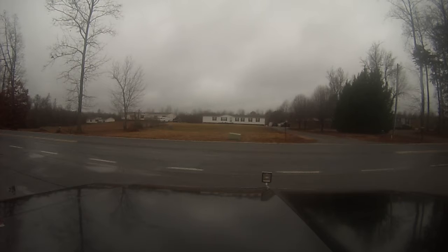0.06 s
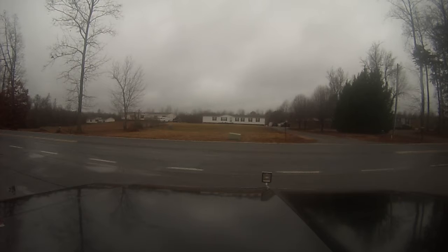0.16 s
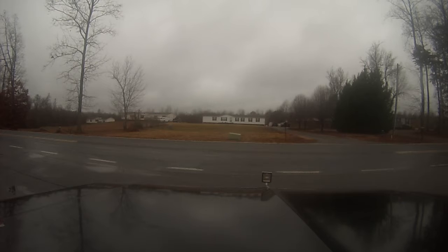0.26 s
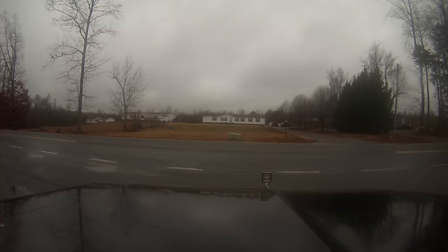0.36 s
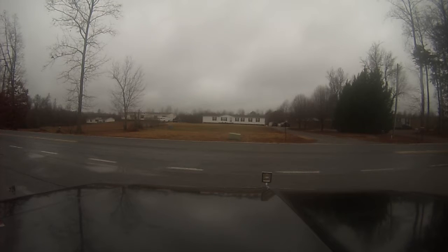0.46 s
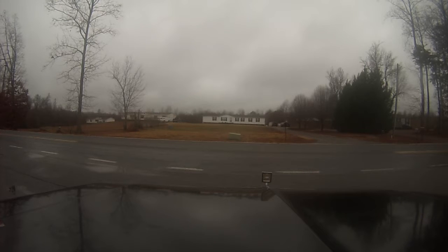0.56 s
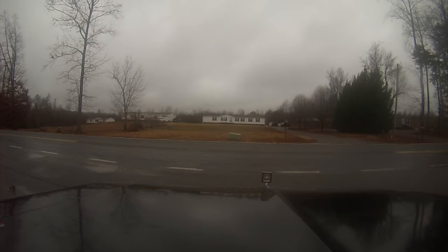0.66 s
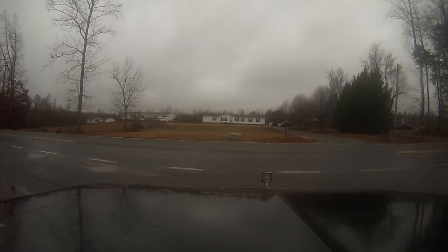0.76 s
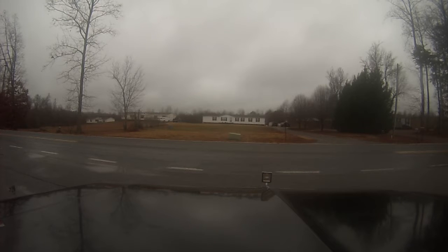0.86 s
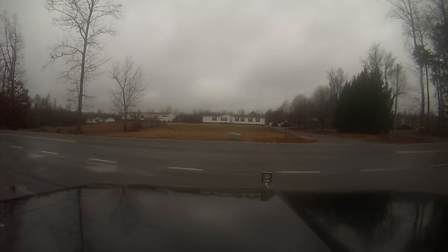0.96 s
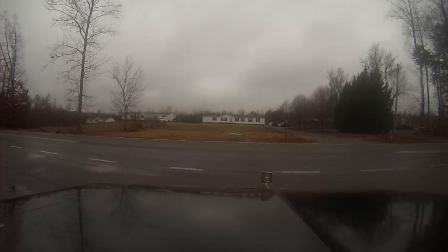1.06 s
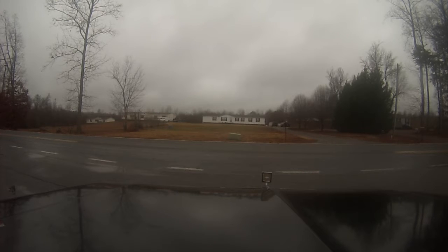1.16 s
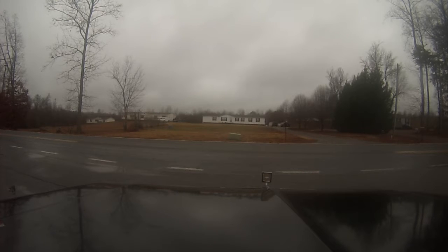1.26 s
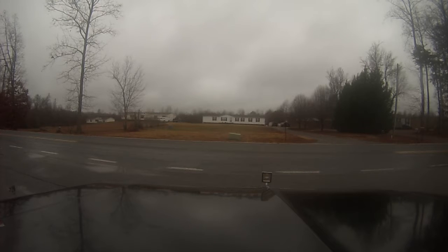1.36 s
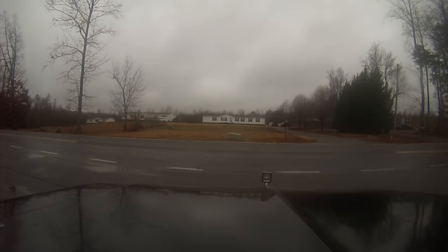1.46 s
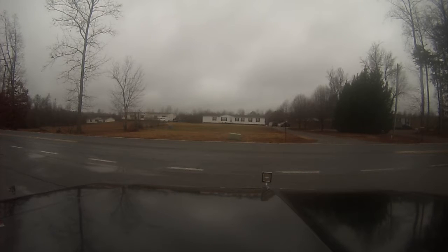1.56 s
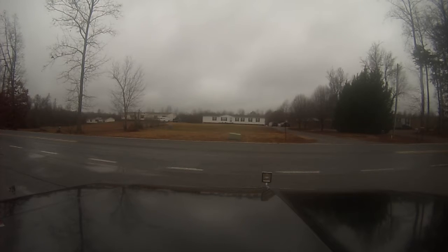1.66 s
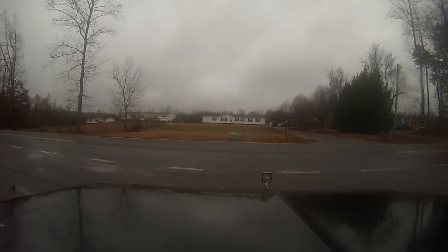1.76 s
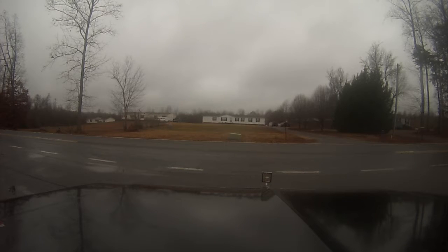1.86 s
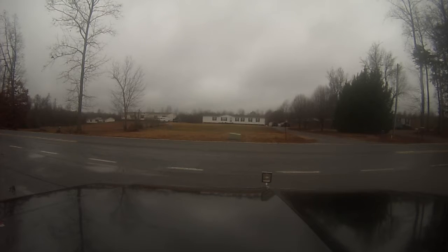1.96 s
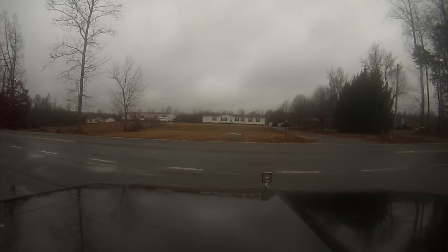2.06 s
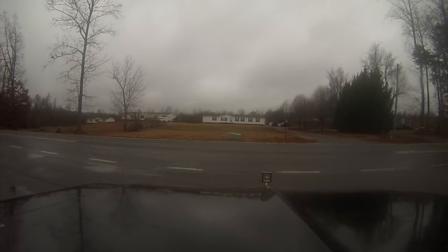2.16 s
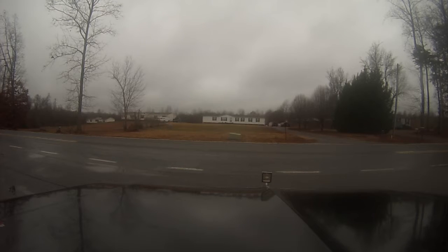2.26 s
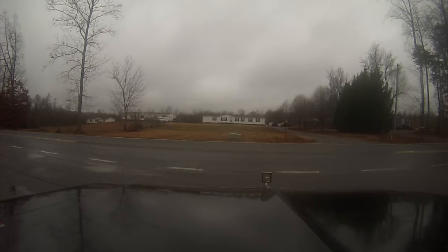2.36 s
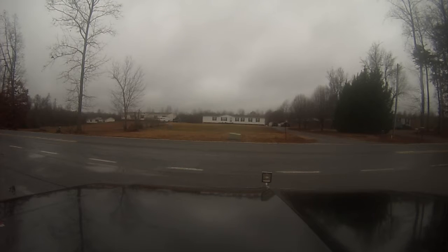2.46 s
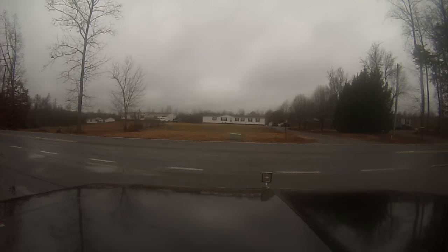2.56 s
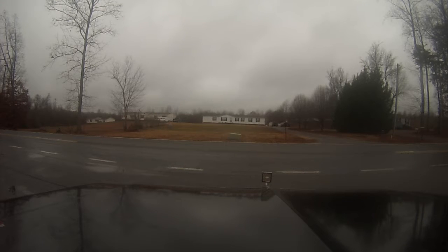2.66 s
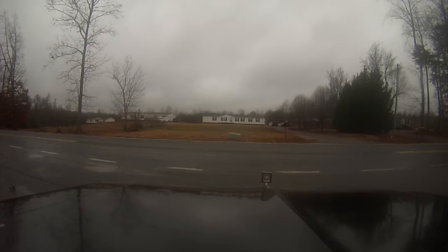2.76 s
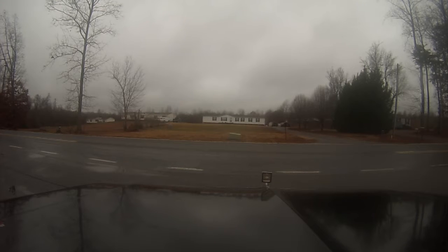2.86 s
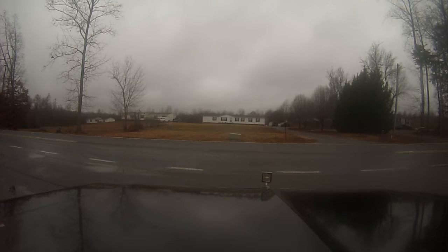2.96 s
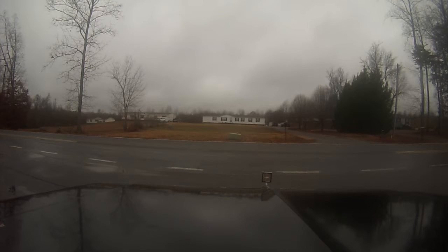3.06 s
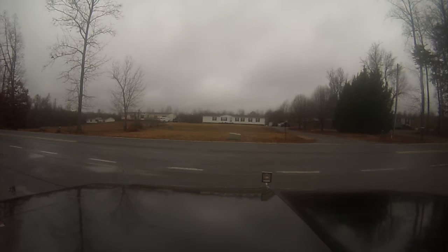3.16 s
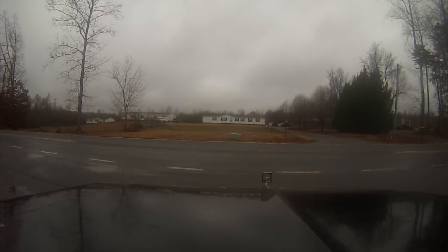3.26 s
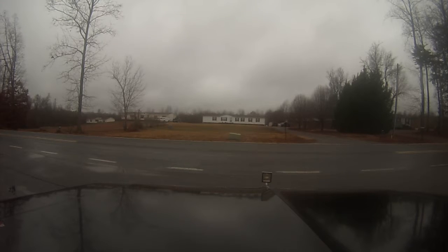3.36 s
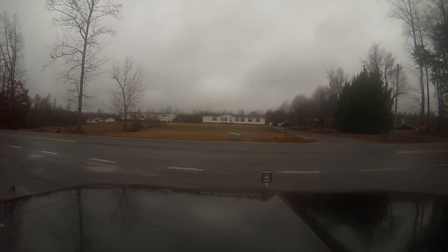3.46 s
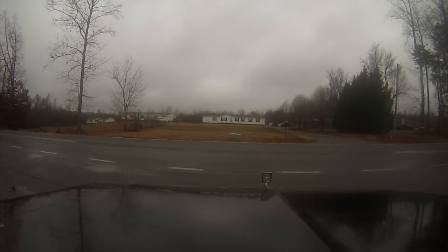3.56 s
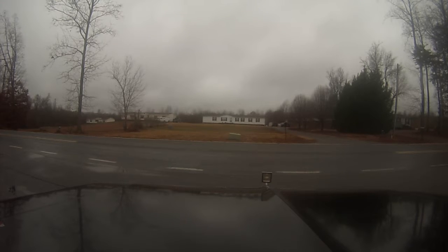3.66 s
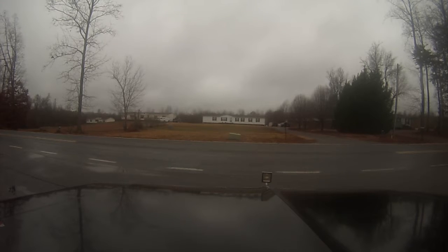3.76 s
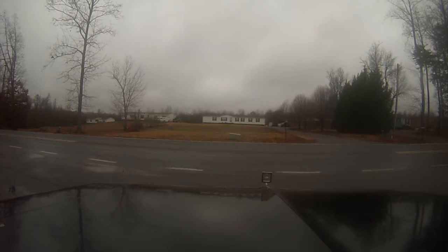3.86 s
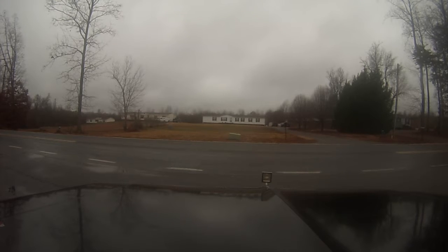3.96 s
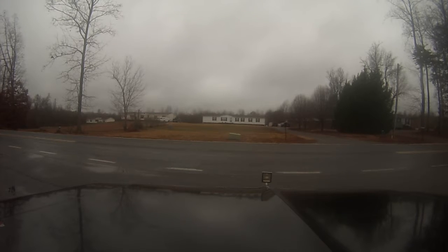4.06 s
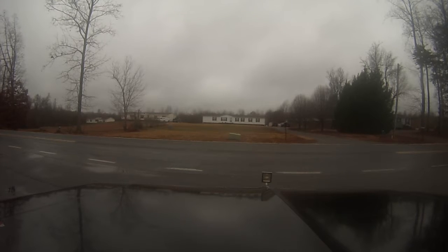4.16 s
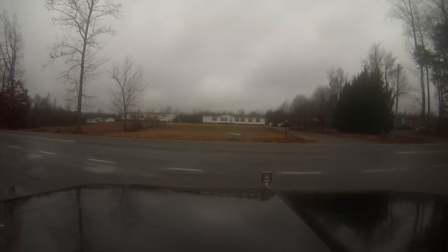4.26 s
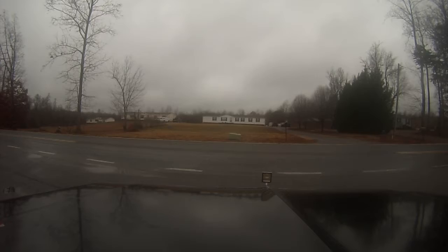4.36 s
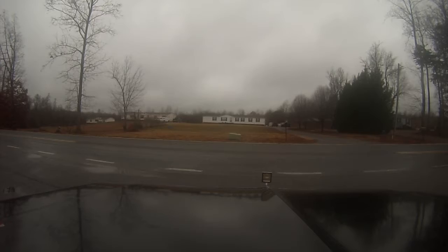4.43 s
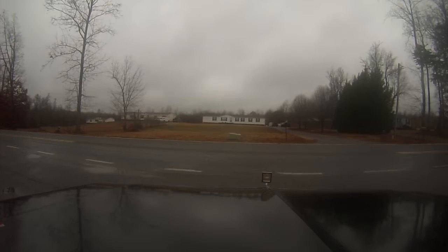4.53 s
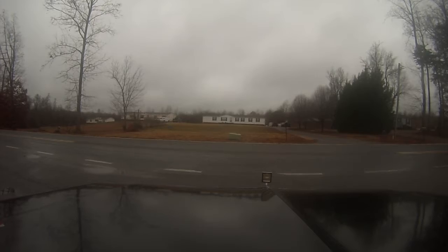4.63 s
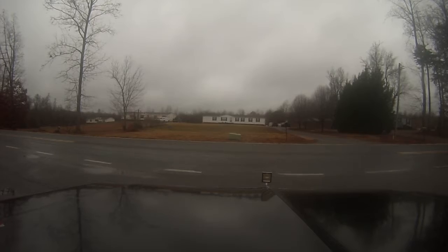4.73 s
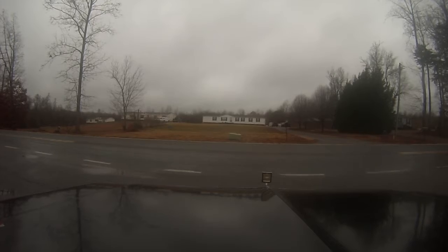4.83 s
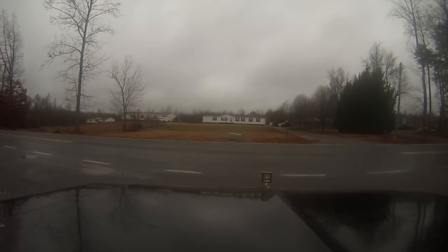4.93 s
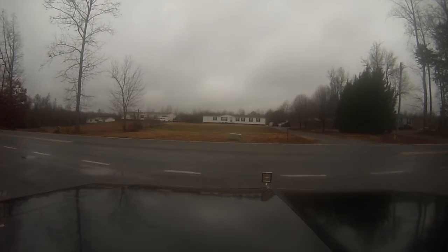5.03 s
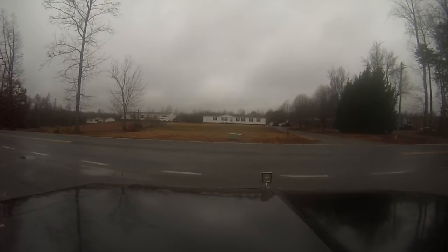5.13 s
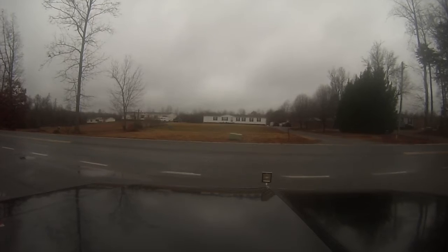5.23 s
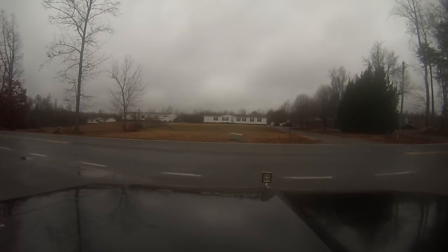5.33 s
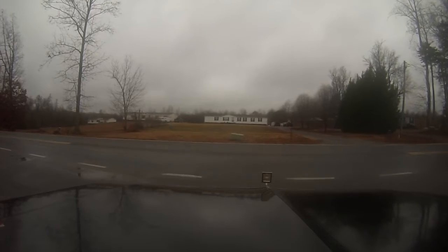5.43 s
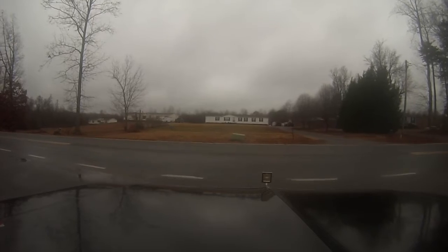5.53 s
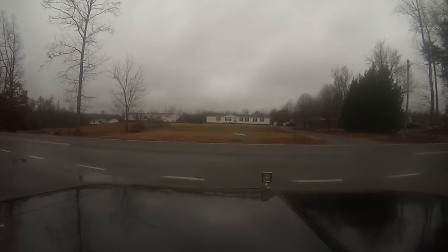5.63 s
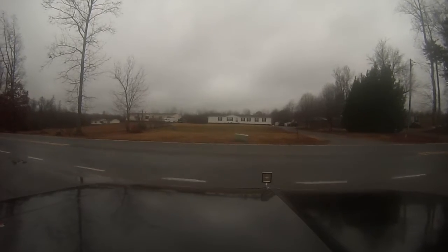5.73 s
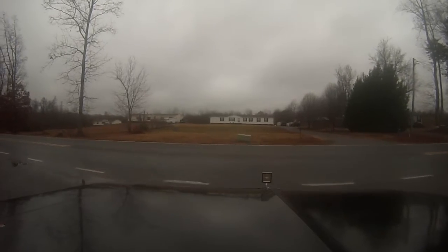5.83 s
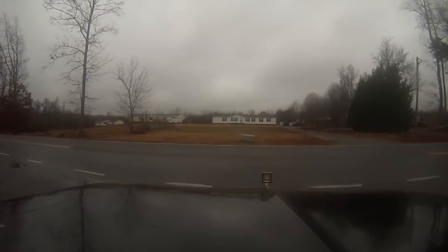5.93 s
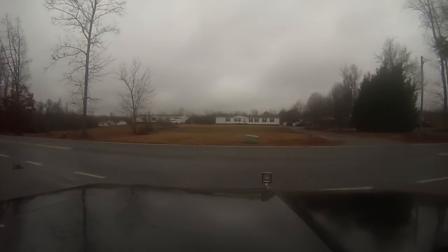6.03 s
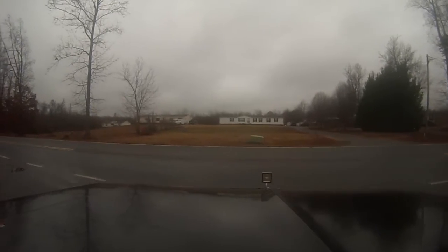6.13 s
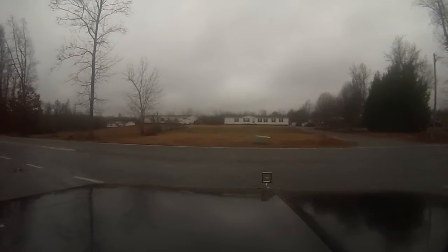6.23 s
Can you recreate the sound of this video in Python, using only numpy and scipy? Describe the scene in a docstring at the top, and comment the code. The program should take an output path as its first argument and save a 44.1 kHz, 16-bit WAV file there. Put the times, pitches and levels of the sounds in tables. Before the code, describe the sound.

A truck engine idles with a low, chugging hum, heard from inside the cab, then revs up and pulls away.

```python
"""Inside the cab of a V8 truck. At first the engine idles: unequal cylinders make the cab air chug
and boom near 137 Hz, the body rocks on its mounts, and a heater blower rushes and hums throughout.
After about four seconds the truck pulls away. The crank orders climb through the panel resonances,
and the intake growl and engine roar grow with the load, with brief pitched swells in the roar.
Near the end, loose trim buzzes and chirps as the body twists, and the loudest moments crackle softly."""
import sys
import numpy as np
from scipy.fft import rfft, irfft, next_fast_len
from scipy.io import wavfile
from scipy.ndimage import map_coordinates

SR = 44100
rng = np.random.default_rng(int(sys.argv[2]) if len(sys.argv) > 2 else 0)


def int16_out(signal):
    """Quantize to a 16-bit WAV file."""
    q = np.round(np.clip(np.atleast_2d(signal).T, -1, 1) * 32767)
    wavfile.write(sys.argv[1], SR, q.astype(np.int16))


N = 277389
FIRINGS = 8  # per four-stroke cycle

# Each row: time in seconds, firings per second, load in dB relative to full pull.
SPEED_AND_LOAD = [(0, 37.34, -26), (4.25, 37.34, -23), (4.5, 42, -19), (4.87, 44.7, -16.5), (5.04, 48, -14),
                  (5.14, 51, -12), (5.23, 56, -10), (5.33, 62.5, -7), (5.53, 69, -5.5), (5.62, 72, -4.5),
                  (5.71, 75.2, -1.5), (5.78, 83, .5), (5.96, 98, -2), (6.01, 101, -8), (6.06, 104, -7.5),
                  (6.1, 106.5, -4), (6.18, 111, -2.5), (6.29, 115, 0)]
def crank():
    """Phase is the integral of frequency: a slightly unsteady firing rate gives the count of cycles."""
    rate, load_db = curves(SPEED_AND_LOAD)
    cycles = np.cumsum(rate * (1 + 0.0063 * wobble(11))) / SR / FIRINGS
    return rate, cycles, load_db

# Each row: order of the cycle, level in dB once pulling (before the panels), dB per dB of load till then.
STRONG_ORDERS = [(8, -28.5, .9), (16, -34, 1.2), (24, -32, 1.25), (11, -33, 1.5)]
# Panel resonances and dips. Each row: centre in Hz, width in Hz, gain in dB.
PANEL_MODES = [(51, 6, 4), (69, 10, 9), (78, 6, -14), (87, 4, 5), (93, 4, -8), (101, 8, 8), (111, 12, 9),
               (150, 16, 7), (170, 20, -5), (205, 30, 5), (308, 20, -12)]
def firing_orders(rate, cycles, building_db):
    """Forced vibration: harmonics of the engine cycle are lifted or damped as they sweep past panels."""
    out = 0
    for order, db, growth in STRONG_ORDERS:
        turns = order * (cycles + 0.006 * wobble(25))  # firings come a little early or late
        panel_db = bumps_db(PANEL_MODES, order * rate / FIRINGS)
        out += tone(turns, db + growth * building_db + panel_db + 2.5 * wobble(25))
    return out

# Each row: order of the cycle, level in dB at idle.
UNEVEN_ORDERS = [(3, -46), (4, -52.5), (6, -45.5), (32, -41.5), (40, -41), (42, -54.5), (56, -43.5)]
def uneven_cylinders(rate, cycles):
    """Unequal cylinders repeat once a cycle; their harmonics flutter with the burn and fade with speed."""
    evening_db = -0.8 * (rate - rate[0])
    return sum(tone(order * cycles, db + 1.2 * wobble(2.1) + evening_db) for order, db in UNEVEN_ORDERS)

# Three noise spectra. Each row: frequency in Hz, relative spectral density in dB.
LOW_SPECTRUM = [(18, -41.5), (30, -14), (43, -8.5), (105, -3), (138, -12), (170, -14), (205, -2), (267, -7),
                (301, -13), (497, -27.5), (700, -52), (1540, -120)]
INTAKE_SPECTRUM = [(120, -90), (240, -25), (310, 0), (410, -3), (560, -30), (1200, -120)]
HIGH_SPECTRUM = [(320, -12), (550, -9.5), (800, -8), (1400, -6), (2070, -12), (2800, -19), (3300, -21.5),
                 (4300, -31), (6000, -47), (15000, -81)]
# Engine bay resonances and dips. Each row: centre in Hz, width in Hz, gain in dB.
BAY_MODES = [(1160, 60, 1.5), (1304, 49, -7.5), (1670, 52, 3), (1840, 37, 2), (1920, 46, 3),
             (2080, 51, -4.5), (2300, 84, -5), (2450, 79, -7.5)]
def roar(cycles, load_db, building_db):
    """Broadband engine noise grows with load; the firings amplitude-modulate its highest band."""
    low = amp(-21 + 0.5 * load_db + 0.2 * building_db) * rush(LOW_SPECTRUM)
    intake = amp(-32 + 1.3 * load_db) * rush(INTAKE_SPECTRUM)
    throb = 1 + 0.14 * np.cos(2 * np.pi * FIRINGS * cycles)
    high = amp(-31 + load_db + 0.94 * wobble(20)) * throb * rush(HIGH_SPECTRUM, BAY_MODES)
    return low + intake + high

# Each row: time of the peak in seconds, seconds to fall 24 dB, frequency in Hz, peak level in dB.
ROAR_SWELLS = [(4.5, .04, 1420, -41), (4.56, .035, 1420, -42), (4.642, .035, 1420, -42),
               (5.05, .1, 1650, -50), (5.22, .04, 1950, -47), (5.315, .052, 493, -39),
               (5.755, .04, 495, -34), (5.76, .057, 945, -39), (6.112, .05, 768, -43), (6.2, .12, 62, -29),
               (6.254, .036, 1400, -40)]
def roar_swells():
    """Tone bursts: brief pitched swells in the roar, with Gaussian envelopes and an unsteady pitch."""
    t = np.arange(N) / SR
    drift = wandering_turns(0, 9, 40)
    return sum(tone(hz * t + drift, db - 24 * ((t - peak) / fall) ** 2)
               for peak, fall, hz, db in ROAR_SWELLS)

# Each row: time in seconds, level of the boom in dB before the kicks scale it.
BOOM_LEVEL = [(0, -38), (.19, -22), (.62, -22), (.95, -24), (1.4, -22), (1.7, -24), (1.95, -22), (2.2, -30),
              (2.33, -24), (2.44, -27), (2.57, -20), (2.8, -25), (3.2, -30), (3.33, -34), (3.42, -22),
              (3.8, -23), (3.95, -21), (4.07, -24), (4.15, -36), (4.55, -34), (4.68, -26), (4.82, -36),
              (4.91, -19), (5.03, -20), (5.13, -36), (5.18, -19), (5.23, -28), (5.28, -18), (5.33, -19),
              (5.4, -38), (5.46, -20), (5.52, -28), (5.57, -19), (5.62, -22), (5.68, -36), (5.78, -21),
              (5.82, -24), (5.87, -13), (5.912, -30), (5.95, -16), (6.02, -15), (6.08, -30), (6.14, -24),
              (6.19, -30), (6.24, -21), (6.29, -28)]
# Each row: place in the cycle from 0 to 1, relative strength in dB.
CYLINDER_KICKS = [(.24, -5), (.52, -6.5), (.89, 0)]
# Each row: frequency in Hz, width in Hz, level of the strongest kick in dB, kicks laid out as above.
CHUG_MODES = [(75, 25, -39, [(.09, -7), (.48, -3), (.68, 0), (.88, -2)]), (107, 18, -30, [(.03, -8),
              (.41, 0), (.73, -4)])]
def cab_boom(rate, cycles, boom_hz=137):
    """Cavity resonance: unequal cylinders kick the cab's low air modes; the chug fades above idle."""
    idling = np.exp(-np.abs(rate - rate[0]) / 3)  # 1/e at 3 firings per second above idle
    throb = 1 - idling + idling * (0.19 + 0.89 * kicks(CYLINDER_KICKS, cycles))
    boom = throb * tone(wandering_turns(boom_hz, 1.35, 9), curves(BOOM_LEVEL)[0])
    chug = sum(kicks(table, cycles) * tone(wandering_turns(hz, 0.2 * width, 15), db)
               for hz, width, db, table in CHUG_MODES)
    return boom + idling * chug

def kicks(table, cycles, width_cycles=0.075):
    """Periodic excitation: Gaussian swells of gain at set places in the cycle, varying in strength."""
    gain = 0
    for place, db in table:
        offset = (cycles - place + 0.5) % 1 - 0.5
        gain += amp(db + 0.78 * wobble(5.11)) * np.exp(-0.5 * (offset / width_cycles) ** 2)
    return gain

# Each row: time in seconds, level in dB.
DRONE_LEVEL = [(0, -50), (4.5, -42), (4.7, -34), (5.35, -36), (5.46, -27), (5.55, -31), (5.63, -27),
               (5.74, -28), (5.88, -33), (5.96, -26), (6.04, -38), (6.25, -30)]
def cab_drone(hz=269.6):
    """A higher resonance of the cab air, near the boom's octave, swells as the pull builds."""
    return tone(wandering_turns(hz, 6, 14), curves(DRONE_LEVEL)[0] + 3 * wobble(25))

# Each row: time in seconds, level in dB.
ROCKING_LEVEL = [(0, -42), (.36, -41), (.5, -31), (1.4, -30), (3.3, -33), (3.75, -26), (4.35, -28),
                 (4.7, -35), (5.4, -27), (5.8, -25), (6.1, -34)]
def body_rocking(hz=22.9):
    """A mass on springs: the body rocks on its mounts at the lower edge of hearing."""
    return tone(wandering_turns(hz, 0.54, 0.96), curves(ROCKING_LEVEL)[0] + 1.5 * wobble(4.4))

# Each row: frequency in Hz, relative spectral density in dB.
BUZZ_SPECTRUM = [(3000, -31), (4300, -2), (5000, 0), (5900, -1.5), (6800, .5), (8200, -6.5), (11300, -14),
                 (12300, -23), (15000, -38)]
def trim_buzz(load_db):
    """Dense small impacts merge into noise whose size jumps from grain to grain and grows with load."""
    grains = amp(2.2 * wobble(250) + 1.0 * wobble(30))
    return amp(-57.5 + 1.4 * load_db) * unit(grains * rush(BUZZ_SPECTRUM))

# Each row: start in seconds, level in dB, frequency in Hz, seconds to decay by 60 dB.
TRIM_CHIRPS = [(5.249, -47, 6650, .025), (5.705, -43, 6860, .035), (5.74, -45, 6940, .03),
               (5.768, -39, 6250, .04), (5.806, -44, 6900, .026), (5.849, -46, 5600, .023),
               (5.973, -50, 7640, .025), (6.045, -48, 6760, .021)]
def trim_chirps():
    """Damped free vibration: a loose part rings briefly and holds its pitch poorly."""
    out, t = np.zeros(N + SR), np.arange(SR // 10) / SR
    attack = 1 - np.exp(-t / 0.0021)
    for start, db, hz, t60 in TRIM_CHIRPS:
        wander = np.cumsum(0.13 * rng.standard_normal(len(t)))
        ring = np.sin(2 * np.pi * hz * t + wander)
        out[round(start * SR):][:len(t)] += amp(db - 60 * t / t60) * attack * ring
    return out[:N]

# Each row: start in seconds, level in dB before filtering.
PEAK_TICKS = [(5.645, -55), (5.88, -46), (5.932, -41), (5.965, -48)]
def peak_ticks(t60=0.02):
    """Broadband transients: decaying bursts of band-passed noise crackle softly at the loudest moments."""
    out, t = np.zeros(N + SR), np.arange(SR // 10) / SR
    for start, db in PEAK_TICKS:
        out[round(start * SR):][:len(t)] += amp(db - 60 * t / t60) * rng.standard_normal(len(t))
    return filtered(out[:N], lambda hz: hz / (hz + 2500) / (1 + (hz / 9000) ** 4))

# Each row: frequency in Hz, relative spectral density in dB.
VENT_SPECTRUM = [(10, -32), (20, -0.5), (30, -24.5), (46, -31.5), (70, -17.5), (140, -11), (270, -17),
                 (420, -28.5), (650, -40.5), (1360, -39), (2300, -43.5), (3300, -50), (5000, -56.5),
                 (9000, -66), (12500, -76.5), (15000, -89.5)]
# Each row: multiple of the fan's turning rate, level in dB.
FAN_HARMONICS = [(1, -50), (3, -37), (4, -48)]
def blower(fan_hz=56.72):
    """Flow noise rushes steadily from the vents while the fan hums at harmonics of its rotation."""
    turns = wandering_turns(fan_hz, 0.12, 2)
    air = amp(-31 + 0.5 * wobble(6.4)) * rush(VENT_SPECTRUM)
    return air + sum(tone(k * turns, db + 0.2 * wobble(6.8)) for k, db in FAN_HARMONICS)

# Cab resonances and dips. Each row: centre in Hz, width in Hz, gain in dB.
CAB_MODES = [(102, 25, -2.5), (74, 17, -3), (122.6, 2.4, -6.5), (139, 36, 4), (163.7, 12, 7),
             (177.3, 8.2, -17.5), (199, 4.9, 5.5), (240.8, 42.5, -6.5), (323, 14, -5), (353, 8.5, 5.5),
             (399, 19, 6.5), (505.8, 44.7, 11), (568.5, 27, 8), (765, 38, 8.5), (846, 34, -4.5),
             (928, 46, 9), (1159, 46, 5), (1229, 34, 3.5), (1300, 43, 10), (1460, 38, 3.5),
             (1415, 143, 9.5), (1540, 82, -5), (1617, 70, 5), (1950, 34, 3.5), (2110, 29, 2.5),
             (2447, 43, 4), (2490, 28, -4), (2073, 109, 9.5), (2833, 130, -10.5), (3320, 440, 2),
             (4270, 90, 3.5), (4650, 200, -5.5), (4950, 220, 3), (2364, 71, 3.5)]
def rush(spectrum, resonances=()):
    """Source and filter: noise shaped by a spectrum, the cab and any further resonances, at rms 1."""
    noise, modes = rng.standard_normal(N), [*CAB_MODES, *resonances]
    return unit(filtered(noise, lambda hz: amp(along(spectrum, hz) + bumps_db(modes, hz))))

def bumps_db(table, hz):
    """Resonance curves: the gain in dB of a sum of Lorentzian peaks and dips."""
    return sum(db / (1 + (2 * (hz - centre) / width) ** 2) for centre, width, db in table)

def tone(turns, db):
    """A sinusoid of given rms level from its running count of turns."""
    return np.sqrt(2) * amp(db) * np.sin(2 * np.pi * (turns + rng.random()))

def wandering_turns(hz, spread_hz, rate):
    """Random frequency modulation: the running count of turns of a pitch that strays about hz."""
    return np.cumsum(hz + spread_hz * wobble(rate)) / SR

def wobble(rate):
    """A smooth random curve with rate knots a second."""
    return map_coordinates(rng.standard_normal(int(N * rate / SR) + 4), [np.arange(N) * rate / SR])

def curves(rows):
    """Linear interpolation: one value per sample for each column after the time."""
    times, *columns = np.transpose(rows)
    return [np.interp(np.arange(N) / SR, times, column) for column in columns]

def along(points, hz):
    """Interpolation of (Hz, value) points on a logarithmic frequency axis."""
    freqs, values = np.transpose(points)
    return np.interp(np.log(hz + 1), np.log(freqs + 1), values)

def filtered(x, response):
    """Linear filtering: the spectrum of x times a frequency response."""
    size = next_fast_len(N + SR // 2)
    return irfft(rfft(x, size) * response(np.fft.rfftfreq(size, 1 / SR)), size)[:N]

def amp(db):
    """Decibels as an amplitude ratio."""
    return 10 ** (np.asarray(db) / 20)

def unit(x):
    """Normalisation to rms 1."""
    return x / np.sqrt(np.mean(x ** 2) + 1e-20)

def scene():
    """Superposition: engine, cab, trim, crackle and blower add in one channel."""
    rate, cycles, load_db = crank()
    building_db = np.minimum(load_db + 4.5, 0)  # the orders stop growing at a load of -4.5 dB
    engine = firing_orders(rate, cycles, building_db) + uneven_cylinders(rate, cycles)
    engine += roar(cycles, load_db, building_db) + roar_swells()
    cab = cab_boom(rate, cycles) + cab_drone() + body_rocking()
    trim = trim_buzz(load_db) + trim_chirps()
    return (engine + cab + trim + peak_ticks() + blower())[None]

def record(dry):
    """Band limiting: an ideal low-pass filter keeps nothing above 15 kHz."""
    return filtered(dry[0], lambda hz: hz < 15000)[None]

dry = scene()
out = record(dry)
int16_out(out)
```